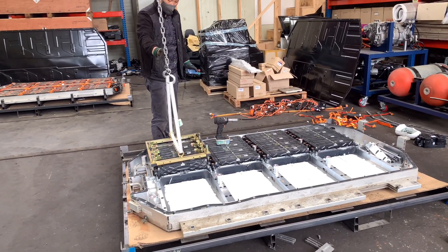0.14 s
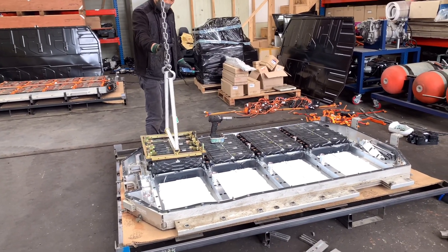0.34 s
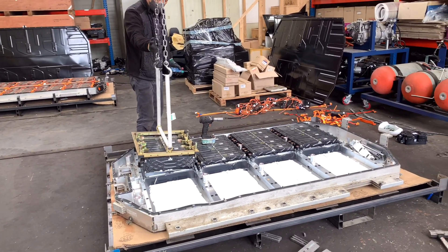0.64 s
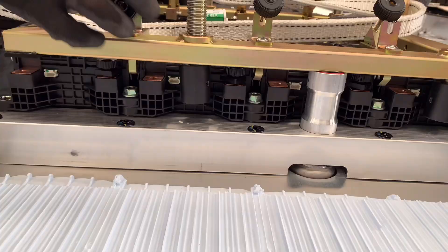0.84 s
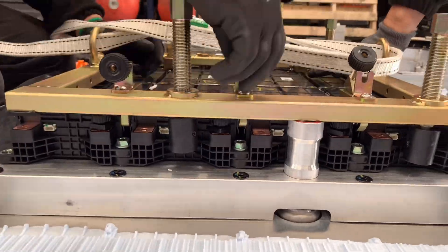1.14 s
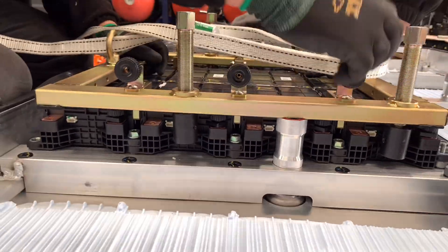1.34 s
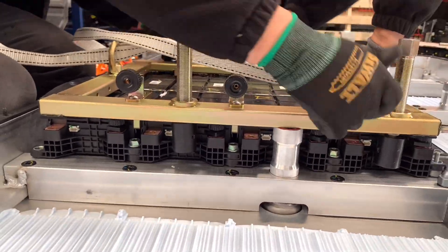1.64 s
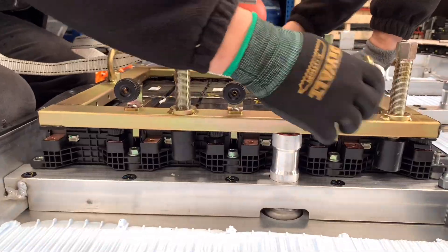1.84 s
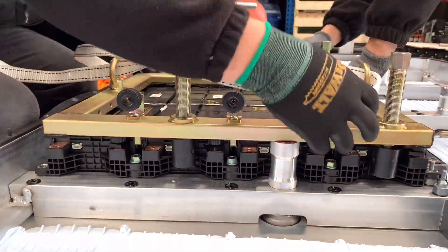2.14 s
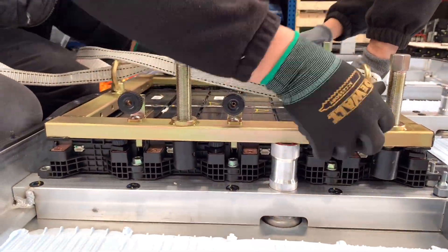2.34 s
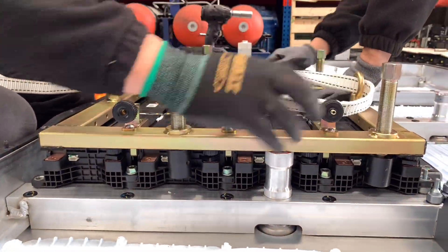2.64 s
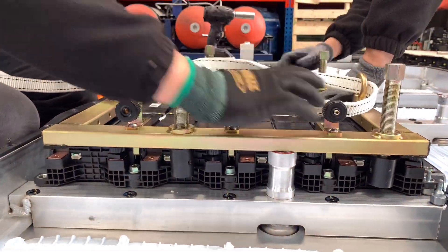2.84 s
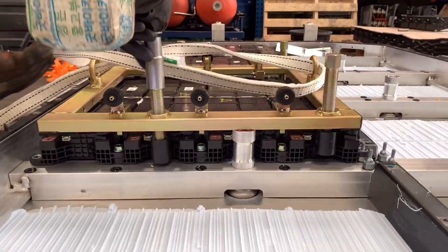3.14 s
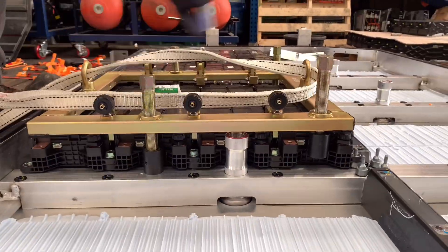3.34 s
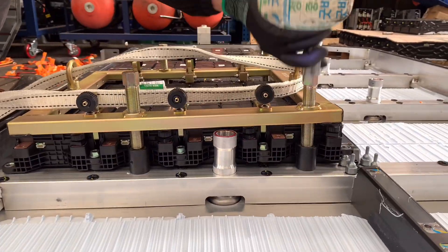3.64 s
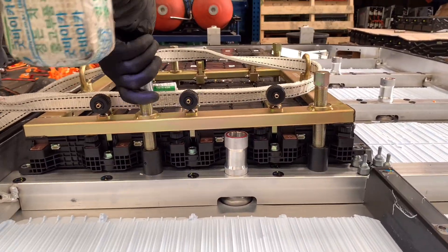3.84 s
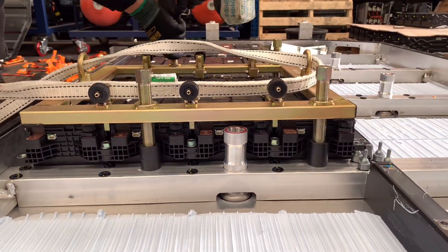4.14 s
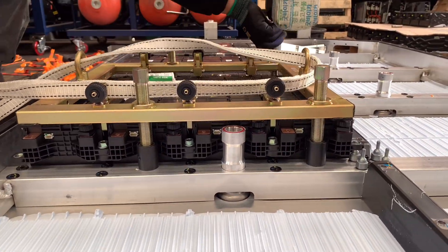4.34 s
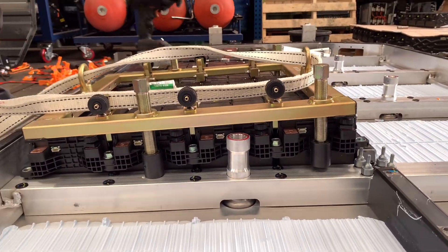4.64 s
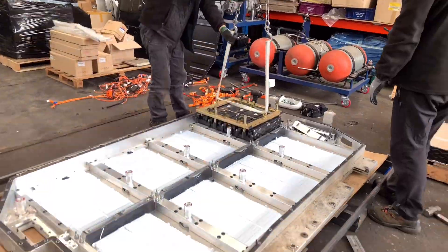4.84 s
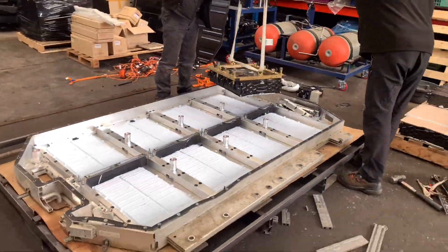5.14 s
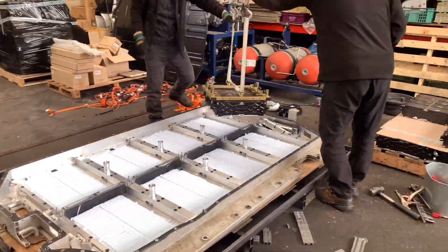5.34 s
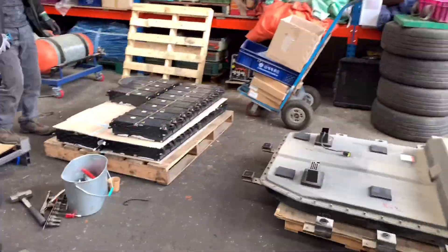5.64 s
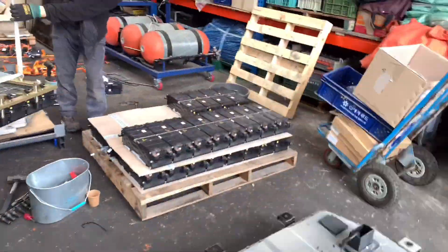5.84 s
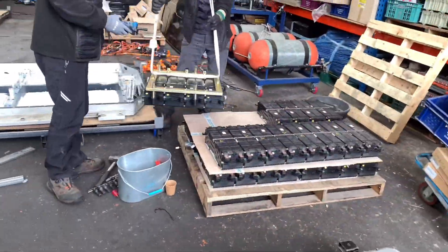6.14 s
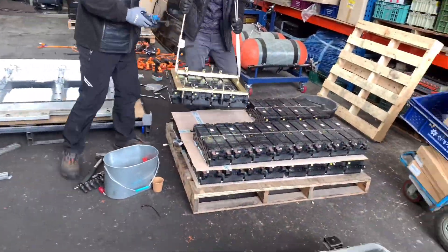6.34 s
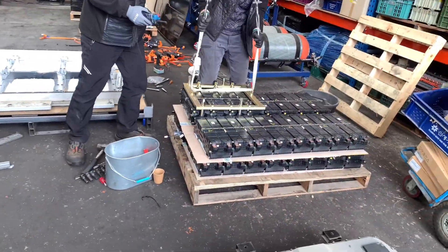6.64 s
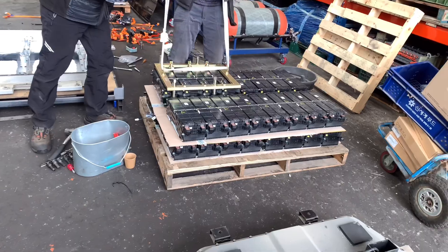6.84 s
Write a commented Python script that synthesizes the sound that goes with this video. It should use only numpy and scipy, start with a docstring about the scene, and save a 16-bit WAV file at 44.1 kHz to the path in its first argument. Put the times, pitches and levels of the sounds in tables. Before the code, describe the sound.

A low machine hum cuts to close gloved knocks and strap rubbing on steel, short power-driver bursts, then reverberant clanking, scraping and squealing metal.

```python
"""Battery modules lifted in a workshop

Four stretches follow each other abruptly. A machine hums: shaped noise and wavering sines.
Gloved hands fit a steel hanger and strap close by: noise pushes strike damped resonances, rubbing is grainy noise.
A power driver runs bolts down in short bursts: rapid blows excite socket, anvil and bolt.
Farther off the hanger clanks on its chain and the module is dragged over and set down on a stack:
decaying modes, scraping noise, singing resonances and squeals in a diffuse hall."""
import sys
import numpy as np
from scipy import signal
from scipy.fft import rfft, irfft
from scipy.io import wavfile
from scipy.ndimage import uniform_filter1d

SR = 44100
rng = np.random.default_rng(int(sys.argv[2]) if len(sys.argv) > 2 else 0)


def file_out(sig):
    """Save sig as 16-bit WAV at sys.argv[1]."""
    # one column per channel
    cols = np.atleast_2d(sig).T
    # limit, then scale
    lim = np.clip(cols, -1, 1)
    pcm = np.round(lim * 32767).astype(np.int16)
    wavfile.write(sys.argv[1], SR, pcm)


N = 307816
TIME = np.arange(N) / SR
HANDS_S, DRIVER_S, LIFT_S, END_S = .87, 2.971, 4.722, 8   # stretch starts; END_S lies past the last sample

# Stereo width. Each row: frequency in Hz, side level relative to mid in dB.
WIDTH = [(1300, -16.5), (2400, -11), (4400, -3), (15000, -1.5)]
# Clear touches on the hanger. Each row: time in s, relative level in dB, pitch of the touched part in Hz.
CONTACTS = [(0.901, -21, 1800), (0.913, -21, 4200), (0.949, -15, 1800), (0.955, -18, 1330),
            (0.985, -20.5, 4200), (1.028, -17.5, 2600), (1.068, -22, 1400), (1.097, -4.5, 3050),
            (1.159, -19, 1800), (1.165, -21, 2600), (1.175, -17.5, 1300), (1.23, -25, 1270),
            (1.29, -16.5, 4200), (1.319, -11, 1350), (1.329, -15, 1310), (1.384, -21, 1400),
            (1.421, -18, 1800), (1.455, -8.5, 2730), (1.486, -20.5, 1300), (1.512, -22, 1800),
            (1.519, -18, 1250), (1.56, -23, 2600), (1.667, -19.5, 9600), (1.705, -16, 6200),
            (1.709, -18, 8000), (1.766, -15, 1320), (1.841, -21, 8000), (1.877, -17, 8000),
            (1.907, -21, 1300), (1.953, -24, 1800), (2.042, -22, 1800), (2.124, -18.5, 2600),
            (2.186, -18.5, 1220), (2.224, -19, 8000), (2.308, -17.5, 1800), (2.422, -22, 1200),
            (2.441, -18, 2600), (2.475, -18, 3100), (2.597, -14.5, 2550), (2.622, -18, 2600),
            (2.639, -21, 3100), (2.651, -17.5, 2600), (2.66, -21, 3100), (2.692, -17, 2600),
            (2.719, -11.5, 2630), (2.732, -16, 2600), (2.783, -12.5, 3100), (2.816, -18.5, 2600),
            (2.833, -20, 2600), (2.843, -18, 1300), (2.896, -20.5, 1270), (2.936, -8.5, 3130),
            (2.96, -22, 1300), (3.046, -31, 4200), (3.128, -9, 2450), (3.405, -41, 970), (3.507, -25, 7240),
            (4.04, -38.5, 3190)]
# Resonances of the hanger clamped on its module. Each row: frequency in Hz, width in Hz, level in dB.
FRAME = [(665, 37, -13.5), (1000, 37, -6), (1301, 75, 1.5), (1760, 140, -5), (2600, 370, -4),
         (3166, 61, -9.5), (4240, 640, -12.5), (6220, 620, -11), (7970, 1600, -10.5), (9570, 1040, -11),
         (12400, 830, -32), (14000, 4500, -18)]
# Pulls that drag the module. Each row: centre in s, relative level in dB, half length in s.
PULLS = [(6.025, -27, .08), (6.2, -25, .07), (6.32, -34, .03), (6.42, -32, .05)]


def amp(db):
    """Decibels to gain."""
    return np.exp(np.asarray(db) * (np.log(10) / 20))


def rms_one(x):
    """Scale to rms 1."""
    return x / np.sqrt(np.mean(x ** 2) + 1e-20)


def gains(rows):
    """Rows of (s, dB, ..) as one gain curve per column."""
    s, *columns = np.transpose(rows)
    return [amp(np.interp(TIME, s, c)) for c in columns]


def during(start_s, end_s, edge_s=0.0052):
    """A gate with linear ramps."""
    opening = np.clip((TIME - start_s) / edge_s + .5, 0, 1)
    closing = np.clip((end_s - TIME) / edge_s + .5, 0, 1)
    return opening * closing


def swells(rows):
    """Sum of bell-shaped gains from rows of (s, dB, half length s)."""
    return sum(amp(db) * np.exp(-((TIME - s) / half_s) ** 2) for s, db, half_s in rows)


def add(track, s, sound):
    """Mix a sound in from time s on."""
    at = max(round(s * SR), 0)
    track[..., at:at + sound.shape[-1]] += sound[..., :N - at]


def cut(x, hz, kind, order=2):
    """Butterworth low-pass or high-pass."""
    return signal.sosfilt(signal.butter(order, min(hz, .45 * SR), kind, fs=SR, output="sos"), x)


def colour(x, spectrum, size=2048):
    """Causal minimum-phase filter through (Hz, dB) points, by way of the folded cepstrum."""
    hz, db = np.transpose(spectrum)
    level_db = np.interp(np.log(np.fft.rfftfreq(size, 1 / SR) + 1), np.log(hz), db)
    cepstrum = irfft(np.log(amp(level_db)))[:size // 2]
    cepstrum[1:] *= 2
    response = irfft(np.exp(rfft(cepstrum, size)))
    return signal.oaconvolve(x, response[None], axes=-1)[:, :x.shape[-1]]


def resonate(x, modes):
    """Parallel two-pole resonances of (Hz, width Hz, dB)."""
    out = 0
    for hz, width_hz, db in modes:
        r = np.exp(-np.pi * width_hz / SR)
        poles = [1, -2 * r * np.cos(2 * np.pi * hz / SR), r * r]
        out = out + amp(db) * (1 - r * r) / 2 * signal.lfilter([1, 0, -1], poles, x + 1e-18)
    return out


def struck(hz, db, t60_s, t):
    """Decaying sines with random phases in mid and side."""
    phases = rng.random((2, len(hz), 1))
    return (amp(db - 60 * t / t60_s) * np.sin(2 * np.pi * (hz * t + phases))).sum(1)


def drift(rate):
    """Random curve of spread 1: straight lines between new values, rate times a second."""
    return np.interp(TIME * rate, np.arange(N // 20), rng.standard_normal(N // 20))


def noise(size=N):
    """Two unrelated white noises: mid and side."""
    return rng.standard_normal((2, size))


def spread(x, width=WIDTH):
    """Filter the side by the width table and scale both so that the mid has rms 1."""
    return np.vstack([x[:1], colour(x[1:], width)]) / np.sqrt(np.mean(x[0] ** 2) + 1e-20)


def tones(lines, wander_hz):
    """Sines of (Hz, dB rms) in the mid that waver in level and pitch."""
    out = np.zeros((2, N))
    for hz, db in lines:
        phase = 2 * np.pi * np.cumsum(hz + wander_hz * drift(60)) / SR
        out[0] += np.sqrt(2) * amp(db + 2 * drift(20)) * np.sin(phase)
    return out


def friction(spectrum, levels, grain_db, grain_rate, split_hz, width=WIDTH):
    """Grainy coloured noise, split into a dull and a bright part with gains of their own."""
    x = colour(noise() * amp(grain_db * drift(grain_rate)), spectrum)
    low_gain, high_gain = levels
    dull = spread(cut(x, split_hz, "low", order=3), width)
    bright = spread(cut(x, split_hz, "high", order=3), width)
    return low_gain * dull + high_gain * bright


def voiced(x, body_db, snap_db, low_hz=2000, high_hz=6000):
    """Weigh a blow's body and snap against its middle; the loudest 2 ms of the mid get rms 1."""
    body, snap = cut(x, low_hz, "low", order=3), cut(x, high_hz, "high", order=3)
    middle = cut(cut(x, low_hz, "high", order=3), high_hz, "low", order=3)
    bands = [(body_db, body), (-6.5, middle), (snap_db, snap)]
    blow = spread(sum(amp(db) * band / band[0].std() for db, band in bands))
    return blow / np.sqrt(uniform_filter1d(blow[0] ** 2, size=88).max())


def hall(x, t60_s=0.29, bright_hz=5000, onset_s=0.004):
    """Diffuse reverberation: the mid convolved with decaying noise of softened treble."""
    t = TIME[:SR]
    decay = amp(-60 * t / t60_s) * (1 - np.exp(-t / onset_s))
    tail = spread(cut(noise(size=SR), bright_hz, "low", order=1) * decay)
    return signal.fftconvolve(x[:1], tail / np.sqrt(SR), axes=-1)[:, :N]


def machine():
    """Rumble and hiss as shaped noise, with hum and motor tones, some steadier, some wavering."""
    # Each row: frequency in Hz, relative density in dB per Hz.
    rumble_spectrum = [(30, -30), (60, -10), (110, -3), (300, -6), (520, -10), (640, -19.5), (1050, -19.5),
                       (1500, -26), (4500, -37), (11000, -50.5), (16000, -65)]
    # Each row: time in s, rumble level in dB, hiss level in dB.
    machine_levels = [(0.0, -38, -45), (0.27, -40, -48), (0.43, -41, -55.5), (0.85, -40.5, -53)]
    # Width of the machine. Each row: frequency in Hz, side relative to mid in dB.
    far_width = [(100, -18), (400, -3), (1300, 0.5)]
    # Steadier tones. Each row: frequency in Hz, level in dB rms.
    hum_lines = [(60, -51.5), (120, -48), (503, -49), (671, -60), (838, -59.5)]
    # Unsteady tones. Each row: frequency in Hz, level in dB rms.
    wavering_lines = [(108, -46), (158, -51), (218, -47.5), (255, -50.5)]
    rumble = friction(rumble_spectrum, gains(machine_levels), grain_db=0.8, grain_rate=45, split_hz=1160,
                      width=far_width)
    hum = tones(hum_lines, wander_hz=1.9) + tones(wavering_lines, wander_hz=8)
    return (rumble + hum) * during(0, 0.865, edge_s=.006)


def workshop_drone():
    """Faint wavering sines under the hands and the lift."""
    # Each row: frequency in Hz, level in dB rms.
    drone_lines = [(479, -54), (511, -59.5)]
    return tones(drone_lines, wander_hz=3.69) * (during(HANDS_S, DRIVER_S) + during(LIFT_S, END_S))


def bustle():
    """The busy hall during the lift: shaped noise in two bands."""
    # Each row: frequency in Hz, relative density in dB per Hz.
    bustle_spectrum = [(70, -53), (170, -23.5), (300, -12), (480, -4), (900, -0.5), (1500, -6.5),
                       (3400, -5.5), (4400, -14), (8000, -14), (16000, -20.5)]
    # Each row: time in s, low band level in dB, high band level in dB.
    bustle_levels = [(4.72, -42, -50.5), (5.1, -42, -52), (5.7, -45, -50), (6.6, -43.5, -52)]
    return friction(bustle_spectrum, gains(bustle_levels), grain_db=1.0, grain_rate=120, split_hz=3000)


def shifting(still_low_db=-72, still_high_db=-76):
    """Sleeve and tool rustle with each move between bolts, as swelling grainy noise over quiet air."""
    # Each row: frequency in Hz, relative density in dB.
    rustle_spectrum = [(100, -54), (250, -22), (500, -5.5), (900, 1), (2000, -5), (5000, -15),
                       (7500, -12.5), (16000, -14.5)]
    # Each row: centre in s, relative level in dB, half length in s, brightness in dB.
    moves = [(2.98, -62, .06, -14), (3.11, -48, .03, 0), (3.55, -55, .06, 4), (3.735, -56, .08, -8),
             (4.04, -62, .06, -3), (4.365, -56, .05, -2), (4.68, -58.5, .09, -7)]
    low = np.hypot(amp(still_low_db), swells((s, db, half_s) for s, db, half_s, _ in moves))
    bright_moves = [(s, db + bright_db, half_s) for s, db, half_s, bright_db in moves]
    high = np.hypot(amp(still_high_db), swells(bright_moves))
    rustle = friction(rustle_spectrum, (low, high), grain_db=4.0, grain_rate=420, split_hz=5700)
    return amp(3.5) * rustle * during(DRIVER_S, LIFT_S)


def squeaks_and_rings():
    """Brief squeaks, creaks and low rings: bell-shaped noise through two resonances in series."""
    # Each row: centre in s, level in dB, half length in s, frequency in Hz, width in Hz.
    brief_rings = [(0.715, -53, .02, 4400, 800), (0.718, -47, .03, 950, 330), (0.54, -53, .05, 2100, 350),
                   (4.462, -58, .015, 1400, 200), (6.772, -29, .04, 890, 50), (6.84, -33, .035, 915, 50)]
    out, t = np.zeros((2, N)), TIME[:16384] - TIME[8192]
    for s, db, half_s, hz, width_hz in brief_rings:
        narrow = resonate(noise(size=len(t)), [(hz, width_hz, 0)])
        ring = resonate(narrow, [(hz, 2 * width_hz, 0)])
        add(out, s + t[0], amp(db) * np.exp(-(t / half_s) ** 2) * spread(ring))
    return out


def hands(grip_db=-46.5, grip_db_per_s=3.5, glove_bright_db=-8):
    """Gloves rub ever more firmly, the strap slides and swishes, tiny contacts tick in the frame."""
    # Each row: frequency in Hz, relative density in dB.
    rub_spectrum = [(59, -65), (100, -47), (481, -10), (1170, -4), (1280, -7), (1550, -10), (2630, -10),
                    (3700, -14.5), (7290, -14), (10900, -9), (16000, -16.5)]
    # Strap drawn over the frame. Each row: centre in s, level in dB, half length in s.
    slides = [(1.35, -41, .08), (1.51, -44, .055), (1.72, -48, .04), (2.16, -39.5, .045), (2.46, -37, .105),
              (2.81, -37, .085)]
    # Strap sliding through its eyes. Each row: centre in s, level in dB, half length in s.
    swishes = [(2.157, -28, 0.014), (2.368, -24.5, 0.017), (2.537, -26.5, 0.013)]
    grip = amp(grip_db + grip_db_per_s * (TIME - HANDS_S))
    bright = np.hypot(amp(glove_bright_db) * grip, swells(slides))
    rubbing = friction(rub_spectrum, (grip, bright), grain_db=3.8, grain_rate=320, split_hz=2480)
    tick_gain = amp(2 * np.minimum(rng.exponential(1, N), 2))
    ticks = (rng.random(N) < 90 / SR) * tick_gain * noise()   # 90 per s on average
    ringing = cut(resonate(ticks, FRAME), 380, "high")
    ticking = grip * spread(cut(ringing, 4000, "low", order=1))
    swish = swells(swishes) * spread(cut(noise(), 6400, "high"))
    return (rubbing + amp(-3.5) * ticking + swish) * during(HANDS_S, DRIVER_S)


def brushes(count=8, level_db=-30, spread_db=2, low_hz=1000, high_hz=4000):
    """Light random finger touches while the hanger is fitted: rows of (s, relative dB, Hz)."""
    when, strength, part = rng.random((count, 3)).T
    s = HANDS_S + (DRIVER_S - HANDS_S) * (np.arange(count) + when) / count
    db = level_db + spread_db * (2 * strength - 1)
    return np.transpose([s, db, low_hz * (high_hz / low_hz) ** part])


def contacts(delay_s=0.0007, crack_db=-16, scuff_db=-28, scuff_s=0.011, part_db=1.5, part_q=9,
             spot_db=3.5, detune=.02):
    """Each touch crunches and scuffs; its part rings, and the damped frame answers anew at every spot."""
    # A small, high part has less body and more snap; a big part is touched more softly.
    part_ref_hz = 1300
    body_ref_db, body_db_per_octave, snap_ref_db, snap_db_per_octave = -4.5, -7.5, -13.2, 4.2
    contact_ref_s, contact_factor_per_octave = .00085, .68
    out, t = np.zeros((2, N)), TIME[:2048]
    frame_hz, width_hz, mode_db = np.transpose(FRAME)
    for s, db, hz in [*CONTACTS, *brushes()]:
        octaves = np.log2(hz / part_ref_hz)
        body_db = body_ref_db + body_db_per_octave * octaves
        snap_db = snap_ref_db + snap_db_per_octave * octaves
        contact_s = contact_ref_s * contact_factor_per_octave ** octaves
        crunch = (t / contact_s) ** 2 * np.exp(-t / contact_s)
        push = noise(size=len(t)) * (crunch + amp(scuff_db) * np.exp(-t / scuff_s))
        strength, shift = rng.standard_normal((2, len(FRAME)))
        frame = zip(frame_hz * (1 + detune * shift), width_hz, mode_db + spot_db * strength)
        ringing = resonate(push, [*frame, (hz, hz / part_q, part_db)]) + amp(crack_db) * push
        add(out, s + delay_s, amp(db) * voiced(cut(ringing, 540, "high"), body_db, snap_db))
    return amp(-6.5) * out


def knocks(contact_s=.0025, casing_q=7, upper_db=-6):
    """Hollow knocks: a soft push rings a plastic casing wall, with a broad resonance an octave above."""
    # Each row: time in s, mid peak in dB, frequency in Hz.
    casing_knocks = [(2.158, -21, 690), (2.445, -19, 687), (2.698, -23, 620), (2.74, -22, 700),
                     (2.76, -27, 640), (2.792, -24, 680), (2.868, -25, 800), (2.905, -25, 650),
                     (3.227, -29, 560), (3.304, -29, 600)]
    out, t = np.zeros((2, N)), TIME[:2048]
    for s, db, hz in casing_knocks:
        push = noise(size=len(t)) * t * np.exp(-t / contact_s)
        wall = resonate(push, [(hz, hz / casing_q, 0), (2 * hz, hz / 2, upper_db)])
        hollow = spread(cut(wall, hz / 2, "high"))
        add(out, s, amp(db) * hollow / np.abs(hollow[0]).max())
    return out


def settling(taps_db=-46, taps_per_s=700, settle_s=.007, lead_s=.004, dull_hz=3000, firm_db=-20):
    """A part wobbles with a few dull, uneven taps as it meets the frame and comes to rest."""
    wobble, t = np.zeros(N), TIME[:2048]
    for s, db, _ in CONTACTS:
        add(wobble, s - lead_s, amp(min(db, firm_db)) * t * np.exp(-t / settle_s))
    taps = noise() * wobble * (rng.random(N) < taps_per_s / SR)
    dull = cut(resonate(taps, FRAME), dull_hz, "low", order=1)
    return amp(taps_db) * spread(cut(dull, 540, "high"))


def squeaks(half_s=0.001):
    """Rubber slips on steel for a couple of milliseconds: a bell-shaped sine burst."""
    # Each row: centre in s, level in dB, frequency in Hz.
    glove_squeaks = [(1.7337, -17.5, 9100), (2.1662, -7.5, 9600), (2.217, -16.5, 9000), (3.509, -28, 7400)]
    out, t = np.zeros((2, N)), TIME[:512] - TIME[256]
    for s, db, hz in glove_squeaks:
        burst = amp(db) * np.exp(-(t / half_s) ** 2) * np.sin(2 * np.pi * hz * t)
        add(out, s + t[0], burst * np.array([[1], [-.4]]))
    return out


def driver(blow_s=0.00069, whirr=0.12, jitter=0.023, spin_up_s=0.0075, run_down_s=0.005, hammer_db=-4,
           hammer_s=.0007, bolt_q=8, wobble_db=3.5, chatter_db=1.8):
    """The hammer strikes hundreds of times a second; anvil, socket and bolt ring as the tool wobbles."""
    # Each row: start in s, end in s, blows per s, level in dB, swell in dB per s,
    # socket, anvil and bolt ring in dB, bolt pitch in Hz.
    bursts = [(3.119, 3.199, 474, -30.5, -35, 2, 0, 13, 2050), (3.212, 3.328, 440, -34, 8, -6, 3, 3, 1270),
              (3.574, 3.639, 324, -35, 0, -4, -10, 3, 980), (3.872, 3.946, 345, -35.5, 0, 3, 1, 7, 2750),
              (4.13, 4.195, 320, -35, 20, 2, 10, 9, 2900)]
    # Each row: frequency in Hz, relative density in dB.
    blow_spectrum = [(88, -54), (150, -29), (504, -6), (1260, -4.5), (2180, -10), (2600, -5.5), (3420, -8),
                     (10000, -8), (16000, -11.5)]
    # Socket resonances. Each row: frequency in Hz, width in Hz, level in dB.
    socket_modes = [(1290, 50, 0), (2570, 220, 7), (2950, 220, 5), (4450, 380, 5.5)]
    # Anvil resonances. Each row: frequency in Hz, width in Hz, level in dB.
    anvil_modes = [(6750, 550, 1), (8400, 800, 1), (10050, 550, 5), (14400, 600, -3)]
    out, t = np.zeros((2, N)), TIME[:8192]
    for start_s, end_s, per_s, db, swell_db_per_s, socket_db, anvil_db, bolt_db, bolt_hz in bursts:
        turns = np.cumsum(per_s * (1 + jitter * drift(120)[:len(t)])) / SR
        grit = noise(size=len(t)) * (np.exp(-(turns % 1) / per_s / blow_s) + whirr)
        strikes = np.diff(np.floor(turns), prepend=0) * amp(2.2 * rng.standard_normal(len(t)))
        hit = noise(size=256) * np.exp(-t[:256] / hammer_s)
        hammer = signal.fftconvolve(strikes[None], hit, axes=-1)[:, :len(t)]
        blows = colour(rms_one(grit) + amp(hammer_db) * rms_one(hammer), blow_spectrum)
        bolt_modes = [(bolt_hz, bolt_hz / bolt_q, 0)]
        ringing = blows
        for ring_db, modes in [(socket_db, socket_modes), (anvil_db, anvil_modes), (bolt_db, bolt_modes)]:
            ringing = ringing + amp(ring_db + wobble_db * drift(45)[:len(t)]) * resonate(blows, modes)
        run_down = np.exp(-np.maximum(t + start_s - end_s, 0) / run_down_s)
        torque = (1 - np.exp(-t / spin_up_s)) * run_down
        chatter = amp(chatter_db * drift(180)[:len(t)])
        level = amp(db + swell_db_per_s * (t - (end_s - start_s) / 2))   # db holds at mid-burst
        add(out, start_s, level * torque * chatter * spread(ringing))
    return out + amp(-36.5) * hall(out)


def singing(hz, q=110, flutter_db=2.5):
    """A sharp resonance kept ringing by unsteady friction; rms about 1."""
    sharp = resonate(noise(), [(hz, hz / q, 0)])
    return amp(flutter_db * drift(14)) * rms_one(resonate(sharp, [(hz, hz / 20, 0)]))


def chain_voice(lines, spells):
    """One voice of the loaded chain, held through each of its spells."""
    held = sum(amp(db) * during(start_s, end_s, edge_s=.06) for start_s, end_s, db in spells)
    voice = sum(amp(db) * singing(hz) for hz, db in lines)
    return held * voice[0].std() * spread(voice)


def chain():
    """The loaded chain sings with a taut and a slack voice."""
    # Taut and slack voice. Each row: frequency in Hz, relative level in dB.
    taut_lines = [(910, -61), (958, -60), (1346, -59), (1588, -60), (3790, -60), (4030, -55.5)]
    slack_lines = [(888, -52), (3380, -59)]
    # Their spells. Each row: start in s, end in s, gain in dB.
    taut_spells = [(4.72, 5.27, 4.5), (6.52, 6.98, 3.5)]
    slack_spells = [(5.27, 5.9, 1), (5.9, 6.98, -2)]
    return chain_voice(taut_lines, taut_spells) + chain_voice(slack_lines, slack_spells)


def clinks(taps_per_s=170, low_hz=900, high_hz=5300, link_q=110, links_db=-7, count=20):
    """Under each pull the chain links tap one another, every link ringing at a pitch of its own."""
    taps = noise() * (rng.random(N) < taps_per_s / SR)
    dealt = rng.integers(0, count, N)   # which link each tap falls on
    ringing = 0
    for k, hz in enumerate(rng.uniform(low_hz, high_hz, count)):
        ringing = ringing + resonate(taps * (dealt == k), [(hz, hz / link_q, 0)])
    return amp(links_db) * swells(PULLS) * spread(ringing)


def overtone(hz, wander):
    """A sine whose pitch wavers by the given share; rms 1."""
    return np.sqrt(2) * np.sin(2 * np.pi * np.cumsum(hz * (1 + wander)) / SR)


def squeals(jitter=.01, flutter_db=3, side_db=-7):
    """Steel catches and squeals: short stick-slip bursts on the second and third harmonic."""
    # Each row: centre in s, half length in s, fundamental in Hz, second harmonic in dB, third in dB.
    catches = [(5.985, .018, 1640, -38, -36), (6.018, .018, 1635, -32, -44), (6.08, .03, 1642, -30, -41),
               (6.175, .027, 1637, -27.5, -38), (6.245, .03, 1640, -36, -38), (6.347, .02, 1650, -33, -41)]
    out, t = np.zeros((2, N)), TIME[:8192] - TIME[4096]
    for s, half_s, hz, second_db, third_db in catches:
        wander = jitter * drift(400)[:len(t)]
        tone = amp(second_db) * overtone(2 * hz, wander) + amp(third_db) * overtone(3 * hz, wander)
        grip = np.exp(-(t / half_s) ** 2) * amp(flutter_db * drift(200)[:len(t)])
        add(out, s + t[0], grip * tone * np.array([[1], [-amp(side_db)]]))
    return out


def drag(slip_db=3.0, knocks_per_s=110, knock_s=.0025, knock_db=7, ring_db=-5):
    """Under each pull the module scrapes and judders: uneven small knocks set it ringing."""
    # Each row: frequency in Hz, relative density in dB.
    scrape_spectrum = [(70, -70), (180, -26), (461, -9), (721, -11), (891, -7.5), (2860, -12.5),
                       (3320, -14.5), (4200, -22), (5900, -18.5), (16000, -21.5)]
    # Each row: frequency in Hz, width in Hz, level in dB.
    module_modes = [(960, 70, -7), (1400, 60, -12), (1724, 50, -7), (2000, 120, -8)]
    hits = (rng.random(N) < knocks_per_s / SR) * rng.uniform(.3, 1, N)
    judder = signal.lfilter([1], [1, -np.exp(-1 / (knock_s * SR))], hits + 1e-18)
    slips = noise() * (amp(slip_db * drift(350)) + amp(knock_db) * judder)
    scrape = amp(-3) * spread(colour(slips, scrape_spectrum))
    ringing = amp(ring_db) * spread(resonate(slips, module_modes))
    return swells(PULLS) * (scrape + ringing)


def clanks(chatter_db=2.5, build_s=0.0016, spot_db=3.5, part_db=0, second_db=-2, part_t60_s=0.14,
           links_db=-6, links_t60_s=0.084, count=12):
    """Loose parts rattle after each blow; struck parts, hanger, sheet metal and chain links ring on."""
    # Each row: time in s, relative level in dB, brightness in dB, pitches of the two parts that meet in Hz.
    hanger_blows = [(4.826, -9, 4, 1375, 1039), (4.863, -13, 2.5, 1760, 2560), (4.88, -16, 1, 1750, 2315),
                    (5.226, -8.5, 3.5, 1425, 2190), (5.25, -13, -4, 2083, 894), (5.558, -27, 11, 894, 2400),
                    (5.613, -24.5, -1, 1320, 1730), (5.88, -24, 6, 3290, 2400), (5.913, -19, -4, 910, 1040),
                    (5.96, -14.5, 1, 1400, 1730), (5.984, -12.5, 1, 1730, 1040),
                    (6.053, -14, 1, 1420, 2080), (6.18, -13.5, 0, 986, 1900),
                    (6.235, -13.5, -2.5, 907, 2180), (6.362, -9, -4, 1744, 1200),
                    (6.392, -17, -1, 1000, 2150), (6.447, -15.5, 5, 953, 2070),
                    (6.699, -9.5, 2, 1950, 3410), (6.712, -16, -5, 904, 1580), (6.815, -16, 7, 912, 2100),
                    (6.869, -15, 2, 1598, 3280), (6.88, -13.5, 0, 1750, 1590)]
    # Each row: frequency in Hz, relative density in dB.
    rattle_spectrum = [(88, -70), (150, -51.5), (466, -15.5), (745, -9.5), (905, 3.5), (1100, -2.5),
                       (1720, 1), (5360, -17), (9820, -20), (16000, -22.5)]
    # Modes of the free hanger. Each row: frequency in Hz, level in dB, t60 in s.
    hanger_modes = [(731, -8, 0.18), (839, -8, .4), (917, 2.5, .35), (1041, 2, 0.35), (1390, 2.5, 0.35),
                    (1573, -5, 0.7), (1730, 6, 0.18), (1876, -10, 0.22), (1955, -1, 0.24), (2076, 2, 0.23),
                    (2180, 0, .2), (2400, -1, 0.31), (2568, -3, 0.2), (3260, -1, 0.2), (3784, -2, 0.18),
                    (4800, -5, .18)]
    body_db, snap_db, ring_db = -7.6, -15.5, -2.5
    rattle_ref_s, rattle_s_per_db = .038, .001   # at 0 dB in the blow table; harder blows rattle longer
    sheet_low_hz, sheet_high_hz, sheet_db, sheet_t60_s = 720, 2700, -1.5, .2
    out, t = np.zeros((2, N)), TIME[:12288]
    hz, mode_db, t60_s = np.transpose(hanger_modes)[:, :, None]
    for s, db, bright_db, *part_hz in hanger_blows:
        rattle_s = max(rattle_ref_s + rattle_s_per_db * db, .001)
        rattle = noise(size=len(t)) * np.exp(-t / rattle_s) * amp(chatter_db * drift(521)[:len(t)])
        hanger = struck(hz, mode_db + spot_db * rng.standard_normal(hz.shape), t60_s, t)
        parts = struck(np.array(part_hz)[:, None], np.array([[0], [second_db]]), part_t60_s, t)
        # sheet and link modes are new at every blow
        sheet = struck(rng.uniform(sheet_low_hz, sheet_high_hz, (count, 1)), 0, sheet_t60_s, t)
        link_hz = rng.uniform(3000, 13000, (count, 1))
        links = struck(link_hz, -20 * np.log10(link_hz), links_t60_s, t)
        ringing = rms_one(hanger) + amp(part_db) * rms_one(parts)
        ringing = ringing + amp(sheet_db) * rms_one(sheet) + amp(links_db) * rms_one(links)
        blow = rms_one(colour(rattle, rattle_spectrum)) + amp(ring_db) * ringing
        blow = blow * (1 - np.exp(-t / build_s))
        add(out, s, amp(db) * voiced(blow, body_db - bright_db, snap_db + bright_db))
    return amp(-6.8) * out


def lift():
    """Clanks, dragging, clinks and squeals reverberate; the chain sings in the busy hall."""
    load = clanks() + drag() + clinks() + squeals()
    return (load + amp(-12.5) * hall(load) + chain() + bustle()) * during(LIFT_S, END_S)


def scene(left_db=-0.78, right_db=0.21):
    """All four stretches, summed as mid and side, then turned into left and right."""
    touches = contacts() + knocks() + settling() + squeaks()
    touch_reverb = amp(-23.5) * during(HANDS_S, DRIVER_S) * hall(touches)
    background = machine() + workshop_drone() + shifting() + squeaks_and_rings()
    mid, side = background + hands() + touches + touch_reverb + driver() + lift()
    return np.array([amp(left_db) * (mid + side), amp(right_db) * (mid - side)])


def record(dry, ceiling=.85, cutoff_hz=15900):
    """Tanh rounds the highest peaks, then an elliptic low-pass cuts the top steeply."""
    rounded = ceiling * np.tanh(dry / ceiling)
    return signal.sosfilt(signal.ellip(10, .2, 70, cutoff_hz, fs=SR, output="sos"), rounded)


dry = scene()
out = record(dry)
file_out(out)
```